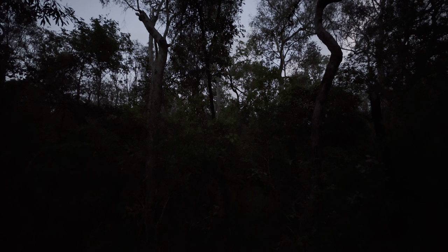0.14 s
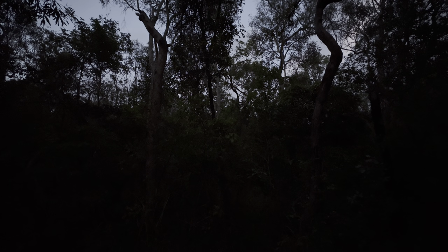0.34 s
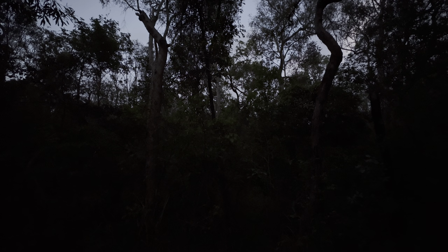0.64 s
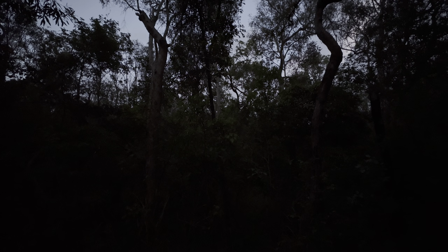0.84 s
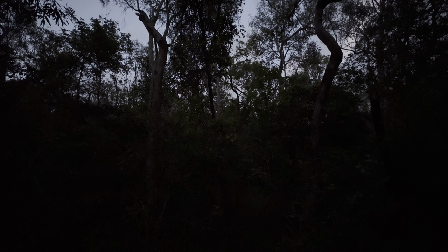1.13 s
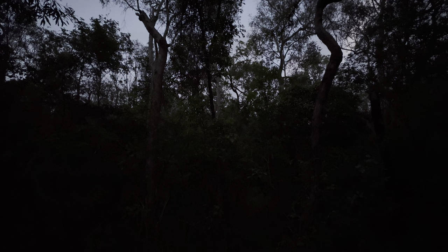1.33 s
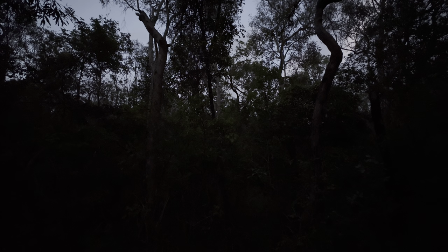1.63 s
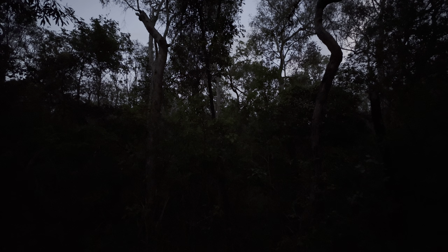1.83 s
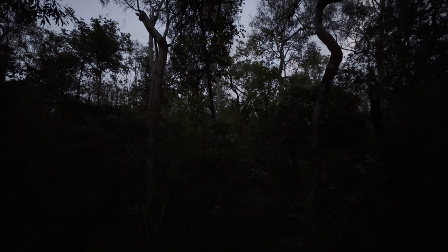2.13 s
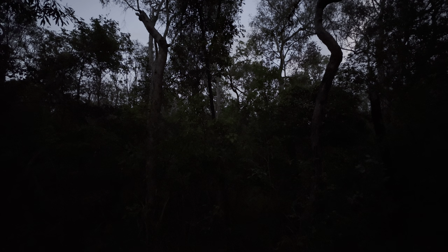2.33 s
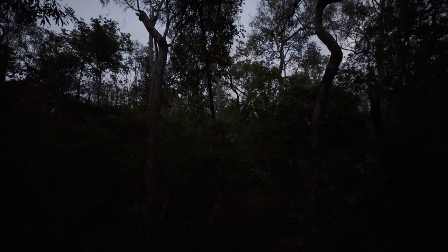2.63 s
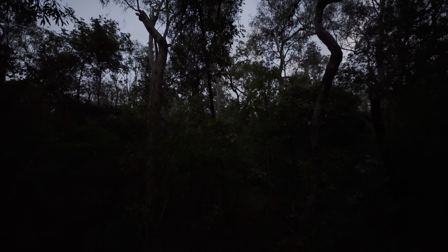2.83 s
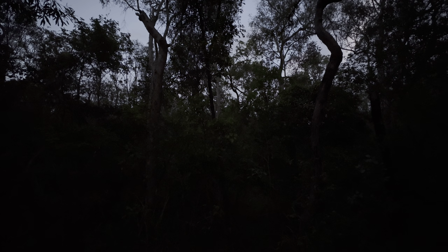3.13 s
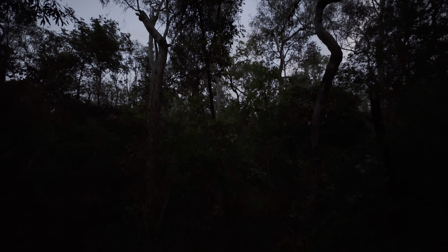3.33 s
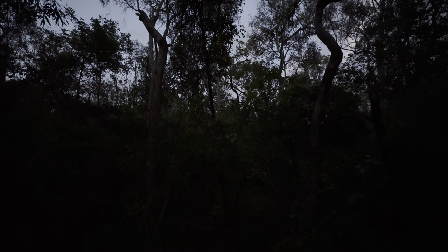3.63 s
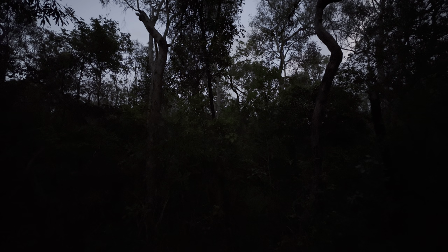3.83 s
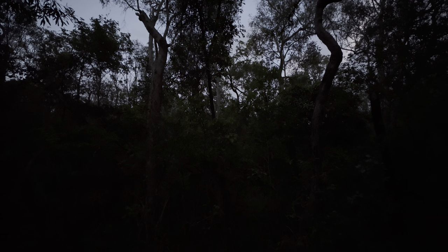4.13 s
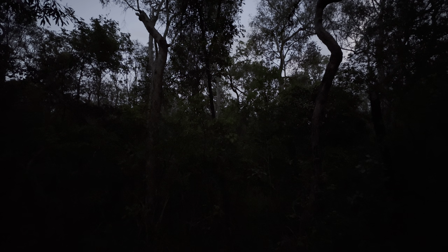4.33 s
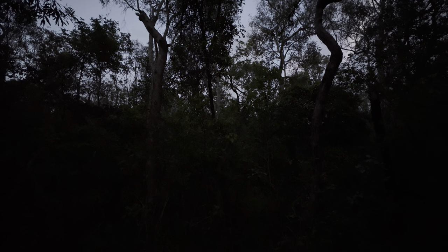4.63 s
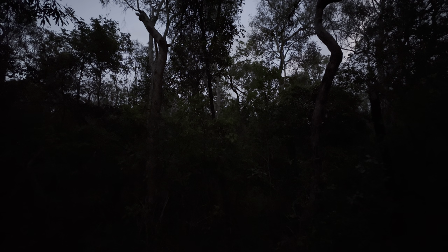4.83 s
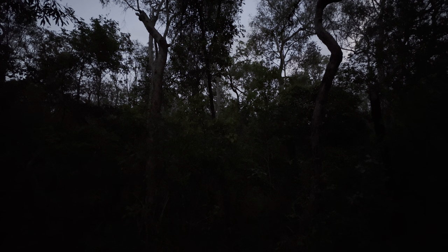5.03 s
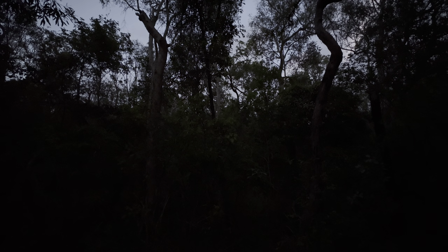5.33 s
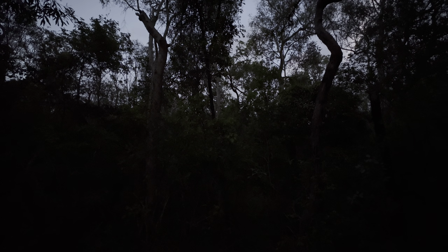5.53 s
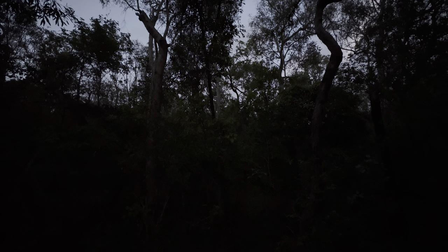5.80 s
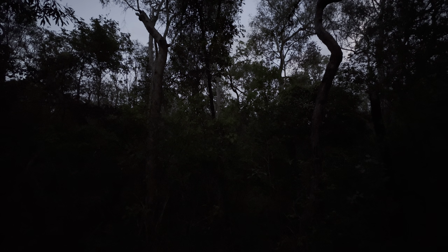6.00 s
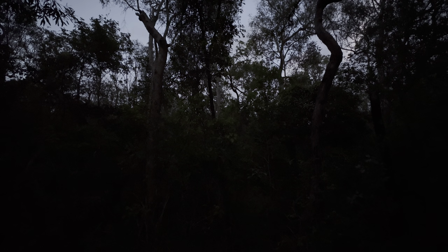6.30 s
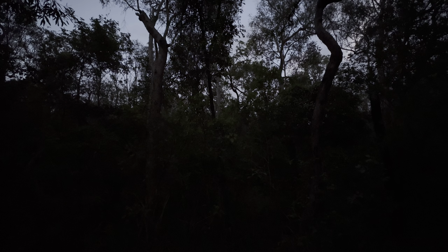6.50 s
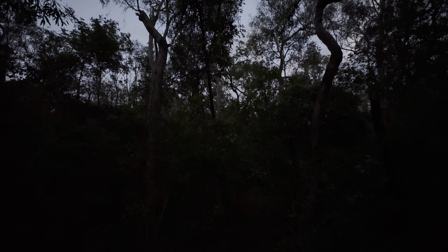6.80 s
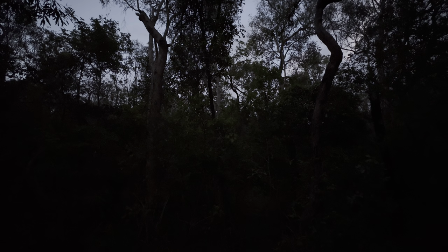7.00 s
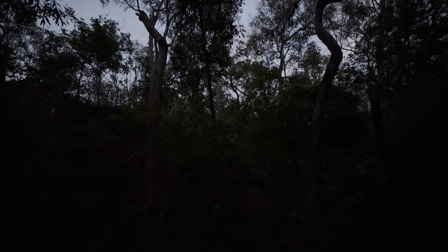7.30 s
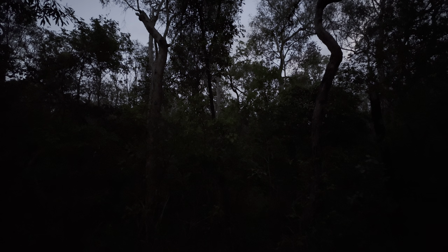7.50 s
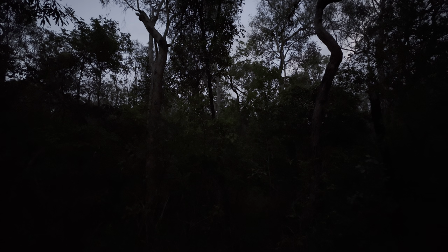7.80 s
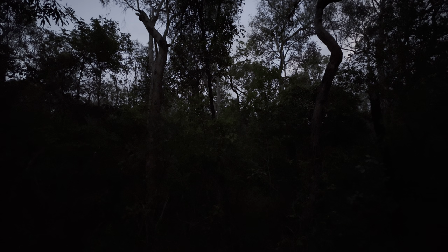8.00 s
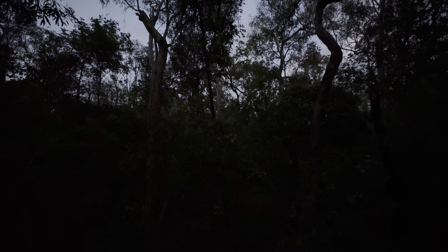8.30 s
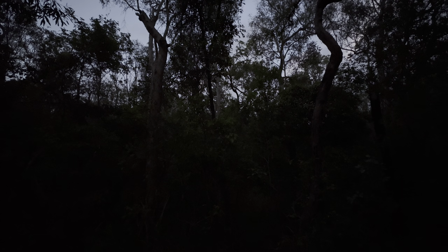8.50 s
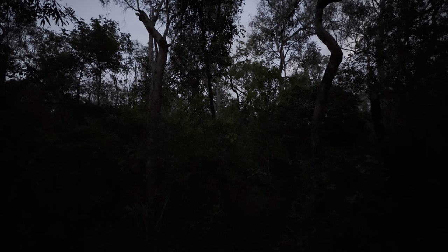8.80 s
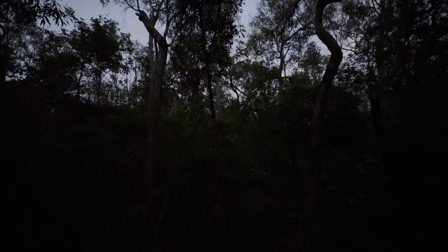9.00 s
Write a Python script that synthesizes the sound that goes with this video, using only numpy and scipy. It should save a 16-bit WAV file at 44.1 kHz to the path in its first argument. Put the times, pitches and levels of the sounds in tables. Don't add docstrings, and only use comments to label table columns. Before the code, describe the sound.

Throughout about nine seconds, a dense cicada chorus forms a bright, throbbing wall around 4 to 8 kHz, clearly stronger on the left. Lower buzzers pulse near 3 to 4 kHz, and very high insects fizz faintly on the right. A soft cricket trill swells from 0 to 2.5, briefly near 3.5, and from 4.3 to 5.5. Distant small birds give short falling yelps until 5, with a held whistle around 3, and quick runs of low, rounded hoots continuing sparsely to the end; a stronger hoot stands out at 2. A crow-like bird makes faint gravelly rasps from the start, stronger after 4.2. It then caws at 5.6, 6.5, 7.6 and 8.6, each around 0.6 seconds, nasal, gently arched and falling, with hoarse edges and short rasps before them. Quiet forest air and faint swelling rumble sit beneath, with slight woodland scatter.

```python
import sys
import numpy as np
from scipy import signal
from scipy.fft import rfft, irfft
from scipy.io import wavfile
from scipy.ndimage import uniform_filter1d

SR = 44100
rng = np.random.default_rng(int(sys.argv[2]) if len(sys.argv) > 2 else 0)


def to_linear_factor(level_db):
    exponent = np.asarray(level_db, float) / 20
    return 10 ** exponent


def transcribe(signal):
    frames = np.atleast_2d(signal).T
    limited = np.clip(frames, -1, 1)
    pcm = np.round(limited * 32767).astype(np.int16)
    wavfile.write(sys.argv[1], SR, pcm)


N = 403515
HZ = np.fft.rfftfreq(N + 45, 1 / SR)


def read(points, hz):
    f, value = np.transpose(points)
    return np.interp(np.log(hz + 1), np.log(f + 1), value)


def curve(rows):
    s, db = np.transpose(rows)
    level_db = np.interp(np.arange(N) / SR, s, db, left=-120, right=-120)
    return uniform_filter1d(to_linear_factor(level_db), size=900)


def evened(x):
    return x / np.sqrt(np.mean(x ** 2) + 1e-20)


def wander(top_hz):
    t = np.arange(0, N + 64, 64)[:, None] / SR
    f = np.geomspace(top_hz / 20, top_hz, num=24)
    slow = np.sin(2 * np.pi * (f * t + rng.random(24))).sum(1) / np.sqrt(12)
    return np.interp(np.arange(N), np.arange(len(t)) * 64, slow)


def colour(x, gain):
    return irfft(rfft(x, N + 45) * gain)[..., :N]


def body(broad, modes):
    power = 1
    for hz, width, db in modes:
        power = power + to_linear_factor(db) ** 2 / (1 + (2 * (HZ - hz) / width) ** 2)
    return to_linear_factor(read(broad, HZ)) * np.sqrt(power)


def resonances(rows):
    return sum(to_linear_factor(db) / (1 + ((HZ - hz) / width) ** 2) for hz, width, db in rows)


def ports(x, other, same, lead, balance_db):
    same = np.clip(same, 0, 1)
    shared = colour(x, same * np.exp(-1j * lead))
    right = shared + colour(other, np.sqrt(1 - same ** 2))
    return np.array([x, colour(right, to_linear_factor(-balance_db))])


def leaves(x, t60):
    t = np.arange(9000) / SR
    tail = rng.standard_normal(9000) * to_linear_factor(-60 * t / t60) * (t > .004)
    return signal.oaconvolve(x, tail / np.linalg.norm(tail))[:N]


def far(x, wet_db, t60, same, lead, balance_db):
    heard = x + to_linear_factor(wet_db) * leaves(x, t60)
    other = np.sqrt(1 + to_linear_factor(wet_db) ** 2) * leaves(x, t60)
    return ports(heard, other, same, lead, balance_db)


def buzz(rate_hz, drift, depth, uneven):
    turns = np.cumsum(rate_hz * (1 + drift * wander(3))) / SR
    gate = np.exp(depth * np.cos(2 * np.pi * turns)) * (1 + uneven * np.cos(np.pi * turns))
    return evened(gate * rng.standard_normal(N))


def phrases(rows, rise_s, grow_db, stop_s):
    t = np.arange(N) / SR
    gain = np.zeros(N)
    for start, end, db in rows:
        effort_db = db - grow_db * np.clip((end - t) / (end - start), 0, 1)
        fade = np.clip((t - start) / rise_s, 0, 1) * np.clip((end - t) / stop_s, 0, 1)
        gain += to_linear_factor(effort_db) * fade
    return gain


def notes(table, droop, overtone_db):
    out = np.zeros(N + SR)
    for s, db, hz, length in table:
        u = np.linspace(0, 1, round(1.2 * length * SR))
        turns = 2 * np.pi * np.cumsum(hz * (1 + droop * (1 / 4 - u ** 2))) / SR
        start = round(s * SR) + SR // 2 - len(u) // 2
        tone = np.sin(turns) + to_linear_factor(overtone_db) * np.sin(2 * turns)
        out[start:start + len(u)] += to_linear_factor(db) * np.hanning(len(u)) * tone
    return out[SR // 2:][:N]


def high_chorus():
    # (frequency [Hz], density [dB per Hz])
    broad = [(3300, -56), (4000, -9.5), (4500, -2), (5200, -1), (6000, -2), (6900, -3), (7150, -7),
             (7900, -11), (8300, -11), (8800, -22.5), (9500, -23.5), (11000, -59)]
    # (frequency [Hz], width [Hz], level [dB])
    modes = [(4735, 97, 2.7), (5680, 24, 1.4), (6225, 62, 6.3), (6441, 172, 9.7), (6670, 190, 0.5)]
    # (frequency [Hz], balance [dB])
    balance = [(4000, 1.5), (4600, 8.5), (6400, 9), (7300, 8.5), (8000, 6.5), (8800, -2.5)]
    singers = np.zeros((2, N))
    for side in singers:
        for rate_hz in (160, 327, 372):
            side += buzz(rate_hz, 0.0299, 0.27, 0.044) * to_linear_factor(1.04 * wander(28))
    x = colour(singers, body(broad, modes))
    lead = -2 * np.pi * (HZ - 6500) * 0.00037
    return to_linear_factor(-32.5) * ports(*evened(x), 0.11, lead, read(balance, HZ))


def low_buzzers():
    # (frequency [Hz], density [dB per Hz])
    broad = [(2000, -33.5), (2550, -11), (2850, -4.5), (3200, 1.5), (3380, -6), (3500, -3), (3800, -3.5),
             (4100, -24.5), (4500, -4.5), (5200, -48)]
    # (frequency [Hz], width [Hz], level [dB])
    modes = [(2750, 22, 5.5), (2865, 11, 11.5), (2970, 30, 4), (3020, 22, 4), (3457, 24, 8.5),
             (3676, 30, 11), (3903, 23, 16), (4000, 10, 19), (4070, 30, 1)]
    throb = to_linear_factor(0.73 * wander(26))
    group = np.array([buzz(232, 0.02494, 0.4, 0.072) * throb, buzz(229, 0.02985, 0.35, 0.067)])
    x = colour(group, body(broad, modes))
    return to_linear_factor(-43.5) * ports(*evened(x), 0.75, 2 * np.pi * HZ * 0.00046, 2.6)


def fizz():
    # (frequency [Hz], density [dB per Hz])
    broad = [(7500, -43), (8800, -0.5), (9600, -21), (10200, 1.5), (11500, -3.5), (13000, -2.5),
             (14200, -3), (14800, -5), (15800, -23), (16500, -36)]
    hiss = rng.standard_normal((2, N)) * to_linear_factor(0.42 * wander(24))
    x = colour(hiss, to_linear_factor(read(broad, HZ)))
    return to_linear_factor(-57) * ports(*evened(x), .97, -2 * np.pi * HZ * .000357, 0)


def cricket():
    # (start [s], end [s], level towards the end [dB])
    chirps = [
        (0.1, 2.55, -66.5),
        (2.58, 2.1, -70),
        (3.25, 3.7, -66.5),
        (4.33, 5.55, -68),
    ]
    gain = resonances([(2205, 23, -2.0), (2444, 49, 1.5)])
    scrapes = np.array([buzz(42, 0.033, 0.77, .1), buzz(45, 0.057, 0.83, 0.087)])
    x = evened(colour(scrapes, gain)) * phrases(chirps, rise_s=.2, grow_db=-3, stop_s=.08)
    return to_linear_factor(-0.5) * ports(*x, 0.41, 2.5, .3)


def caws():
    # (time [s], pitch [Hz])
    lines = [
        [(5.6, 229), (5.63, 241), (5.738, 257), (6.004, 241.7), (6.104, 221), (6.17, 218)],
        [(6.54, 229.5), (6.926, 241.3), (6.978, 223), (7.15, 219.6), (7.21, 213.4)],
        [(7.57, 214), (7.612, 222.3), (7.8, 237.7), (7.946, 222.2), (8.04, 226.6), (8.132, 206), (8.19, 197)],
        [(8.57, 203), (8.722, 226.4), (8.754, 226), (8.872, 215.5), (8.962, 221.3), (9.026, 211), (9.2, 208.6)],
    ]
    tops_db = [-57, -56.5, -56, -55]
    # (frequency [Hz], gain [dB])
    throat = [(600, -51.5), (850, -12.5), (1000, -3.5), (1150, 0), (1450, -2), (1780, 2.5), (2050, -2.5),
              (2350, 5.5), (2600, 0), (3100, -52)]
    # (frequency [Hz], phase [rad])
    port_lead = [(1000, 2.06), (1700, 2.3), (2200, 2.9)]
    bright_db_per_khz = -3
    settle_s, crack_s, attack_s, stop_s = 0.038, 0.068, 0.037, 0.043
    out, shake = np.zeros(N), wander(40)
    for line, top_db in zip(lines, tops_db):
        s, pitch = np.transpose(line)
        at = np.arange(round(s[0] * SR), min(round(s[-1] * SR), N))
        since, left = at / SR - s[0], s[-1] - at / SR
        effort_db = top_db + np.interp(since / (s[-1] - s[0]), [0, 0.58, 1], [-7, 0, -3])
        rough = .03 + 0.21 * np.exp(-since / settle_s) + 0.34 * np.exp(-left / crack_s)
        rough = np.clip(rough, 0, 1)
        hz = np.interp(at / SR, s, pitch)
        turns = np.cumsum(hz * (1 + 0.0033 * shake[at])) / SR
        k = np.arange(2, 14)[:, None]
        heights = to_linear_factor(read(throat, k * hz) + bright_db_per_khz * (k * hz - 1600) / 1000)
        clear = (heights * np.cos(2 * np.pi * k * turns + .6 * k ** 2)).sum(0)
        clear = clear / np.sqrt((heights ** 2).sum(0) / 2)
        hoarse = np.zeros(N)
        hoarse[at] = (0.53 + np.exp(-(turns % 1) / 0.59)) * rng.standard_normal(N)[at]
        hoarse = evened(colour(hoarse, to_linear_factor(read(throat, HZ)))[at])
        edges = np.minimum(since / attack_s, 1) * np.minimum(left / stop_s, 1)
        voice = np.sqrt(1 - rough) * clear + np.sqrt(rough) * hoarse
        out[at] += to_linear_factor(effort_db) * voice * edges
    return far(to_linear_factor(10.0) * out, -8.0, 0.22, 0.87, read(port_lead, HZ), 1.8)


def rasps():
    # (start [s], end [s], top effort [dB])
    breaths = [
        (-.4, 1.42, -70),
        (1.5, 2.6, -71.5),
        (3.0, 3.95, -75.5),
        (4.2, 5.1, -67),
        (5.36, 5.85, -65.5),
        (6.36, 6.6, -67),
        (7.4, 7.7, -68),
        (8.42, 8.6, -63),
    ]
    # (frequency [Hz], width [Hz], gain [dB])
    throat = [(1120, 150, -3.5), (1410, 220, -5), (1750, 120, -5)]
    voice = evened(colour(buzz(110, .15, 1.2, 0.27), resonances(throat)))
    x = to_linear_factor(10.5) * voice * phrases(breaths, rise_s=0.12, grow_db=3.5, stop_s=0.066)
    return far(x, -1.5, 0.089, 0.48, 2.8, 2.2)


def hoots():
    # (first note [s], last note [s], level [dB], first pitch [Hz], last pitch [Hz])
    runs = [(0.067, 0.353, -67, 698, 700), (0.718, 1.65, -65.5, 666, 705), (2.184, 2.763, -68, 695, 706),
            (3.171, 3.874, -65.5, 640, 706), (4.052, 4.537, -69.5, 570, 673),
            (5.252, 5.82, -65.5, 623, 548), (6.805, 7.081, -68.5, 670, 578), (8.051, 8.589, -67, 609, 577)]
    rows = list([
        (2.003, -58.5, 690, 0.14),
        (3.442, -69, 710, .15),
        (6.708, -63, 652, 0.072),
        (8.951, -63, 850, .04),
    ])
    gap_s, hoot_s = .128, .05
    for first, last, db, first_hz, last_hz in runs:
        u = np.linspace(0, 1, round((last - first) / gap_s) + 1)
        a, b = rng.standard_normal((len(u), 2)).T
        pitch = (first_hz + u * (last_hz - first_hz)) * (1 + 0.016 * b)
        rows += zip(first + u * (last - first), db + 1.4 * a, pitch, hoot_s + 0 * u)
    return far(to_linear_factor(2.0) * notes(rows, 0.22, -23), 2.4, 0.36, 0.67, 3.14, 2.7)


def yelps():
    # (time [s], level [dB], pitch [Hz], length [s])
    short = [(0.075, -55, 1223, 0.076), (0.203, -56, 1197, 0.11), (0.38, -59, 1245, .052),
             (0.546, -61, 1160, .1), (0.83, -60, 1100, 0.059), (1.01, -60, 1300, 0.042),
             (1.115, -58, 1410, .035), (1.25, -62, 1160, .11), (1.39, -62, 1098, .041),
             (1.64, -56, 1500, 0.055), (1.831, -60, 1120, .061), (2.165, -57, 1240, .05),
             (2.516, -60.5, 1260, .03), (2.691, -56.5, 1120, 0.064), (3.03, -58, 1120, .062),
             (3.152, -63, 1150, 0.057), (0.61, -61, 1490, 0.049), (4.348, -57, 1320, .04),
             (3.57, -58, 1050, .072), (3.75, -59, 1026, 0.094), (3.904, -57, 1480, .03),
             (4.258, -58, 1120, .081), (4.862, -58, 1185, .068), (5.004, -55, 1233, .1)]
    # (time [s], level [dB], pitch [Hz], length [s])
    held = (3, -58, 1119, 0.6)
    x = notes(short, .16, -20) + notes([held], 0.012, -24)
    return far(to_linear_factor(3.5) * x, -2, 0.11, 0.88, 2.9, 2.6)


def air():
    # (frequency [Hz], density [dB per Hz])
    floor = [(20, -30), (40, -8), (65, 0), (110, -9), (200, -19.5), (400, -21), (650, -11), (800, -19),
             (1100, -5.5), (1800, -4.5), (2200, -4), (2600, -22), (4000, -29), (6000, -56)]
    # (frequency [Hz], coherence [0-1])
    likeness = [(60, 0.91), (150, 0.39), (400, 0.096), (600, 0.55), (2000, 0.38)]
    # (frequency [Hz], phase [rad])
    port_lead = [(60, -.1), (350, 0), (520, 2.2), (2400, 2.8)]
    # (time [s], level [dB])
    rumble = [(0.0, -73.5), (0.99, -78), (1.32, -69.5), (1.81, -76), (2.04, -70), (2.65, -76), (3.13, -67),
              (3.21, -74), (3.41, -69), (6.91, -77), (9.05, -77.5), (9.15, -83)]
    # (frequency [Hz], balance [dB])
    balance = [(60, -2.5), (300, 0.2), (900, 4), (1800, 1.0), (2700, -3.0)]
    noise = rng.standard_normal((2, N))
    pair = ports(*noise, read(likeness, HZ), read(port_lead, HZ), read(balance, HZ))
    whole = evened(colour(pair, to_linear_factor(read(floor, HZ))))
    bass = 1 / (1 + (HZ / 130) ** 4)
    swell = evened(curve(rumble) * to_linear_factor(0.5 * wander(4)))
    return to_linear_factor(-61.5) * (swell * colour(whole, bass) + colour(whole, 1 - bass))


def scene():
    insects = high_chorus() + low_buzzers() + fizz() + cricket()
    crow = caws() + rasps()
    small_birds = hoots() + yelps()
    return insects + crow + small_birds + air()


def low_pass(x):
    return signal.sosfilt(signal.butter(12, 15840, fs=SR, output="sos"), x)


def record(dry):
    return low_pass(dry)


dry = scene()
out = record(dry)
transcribe(out)
```